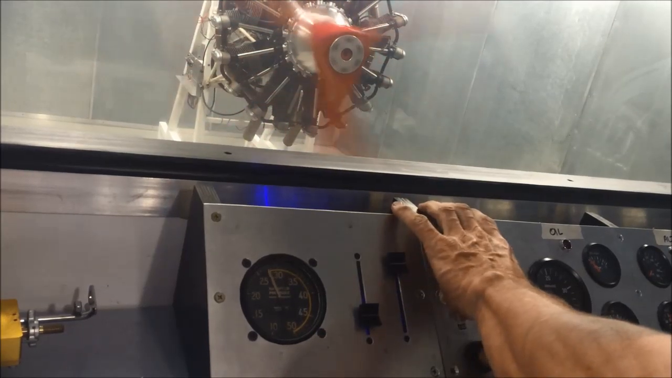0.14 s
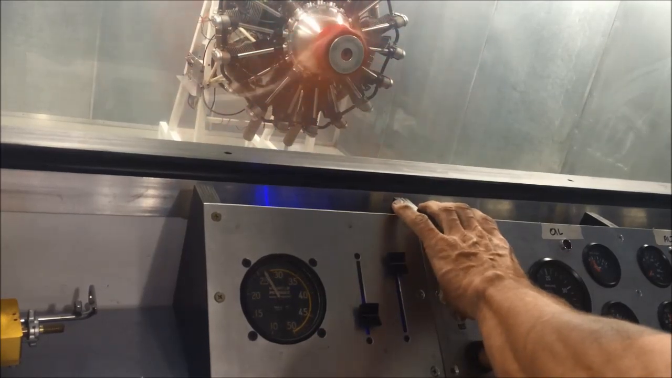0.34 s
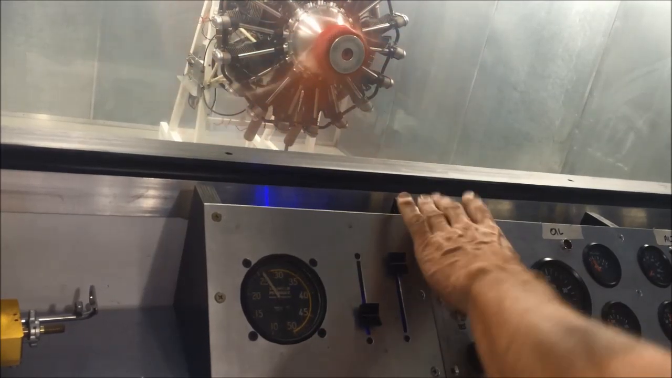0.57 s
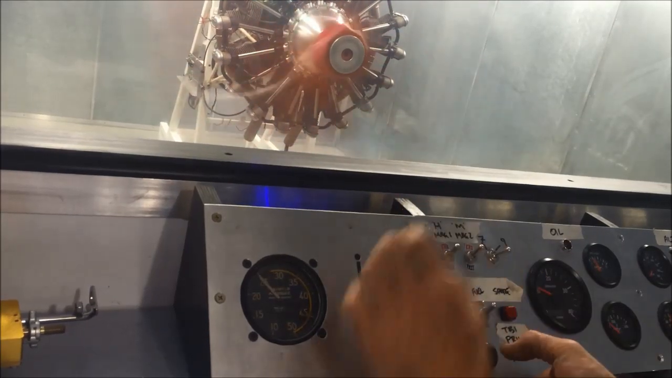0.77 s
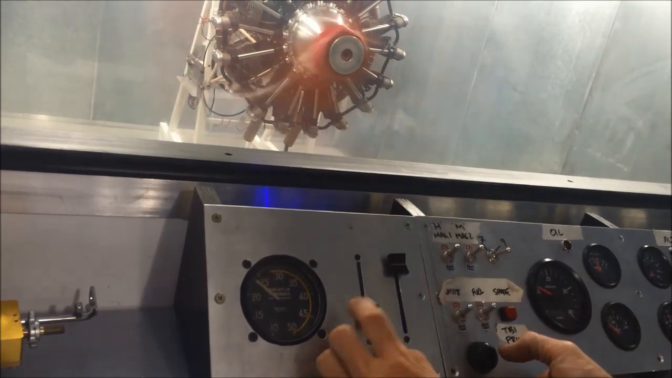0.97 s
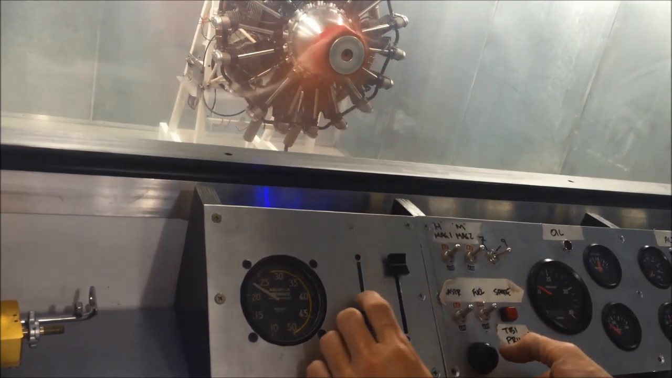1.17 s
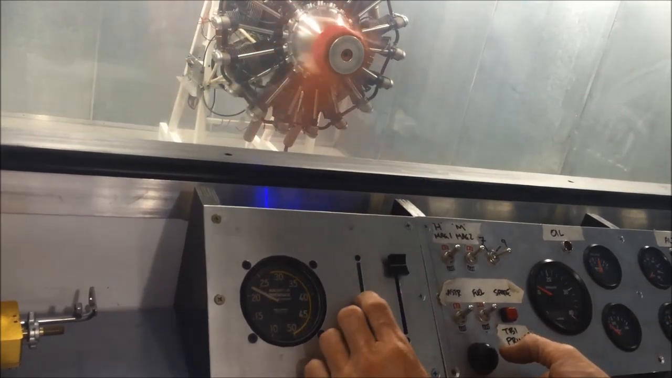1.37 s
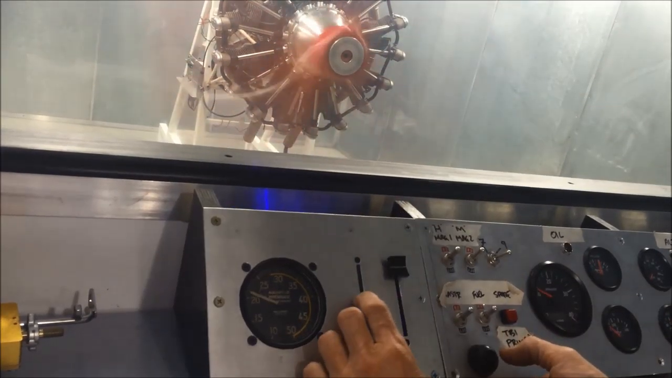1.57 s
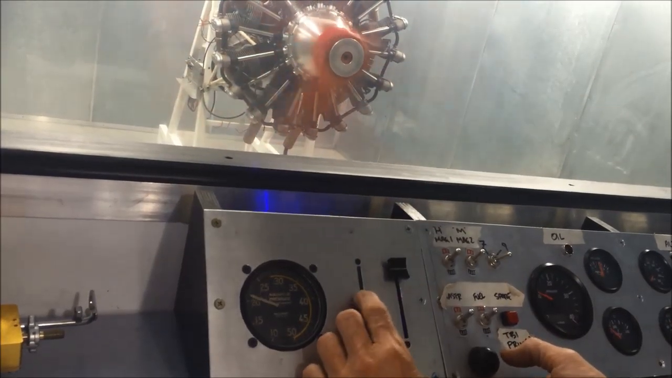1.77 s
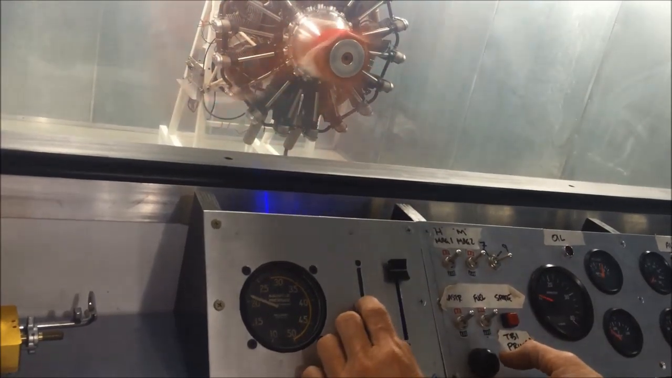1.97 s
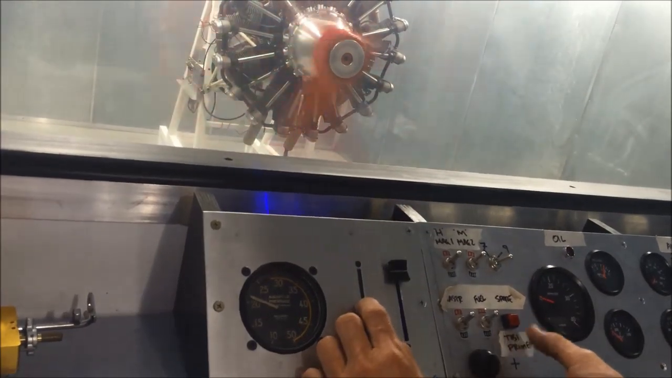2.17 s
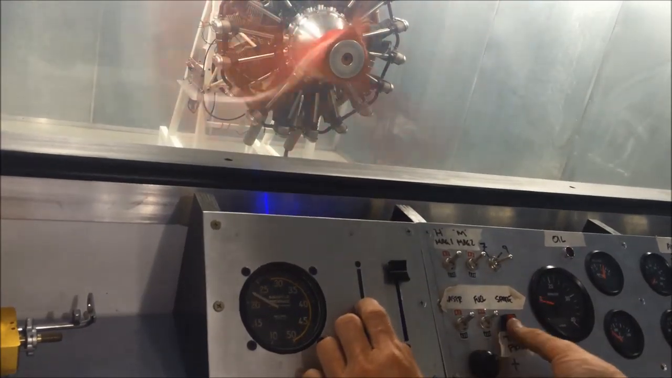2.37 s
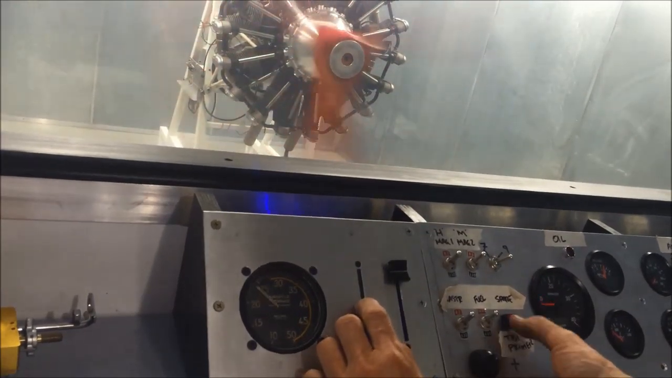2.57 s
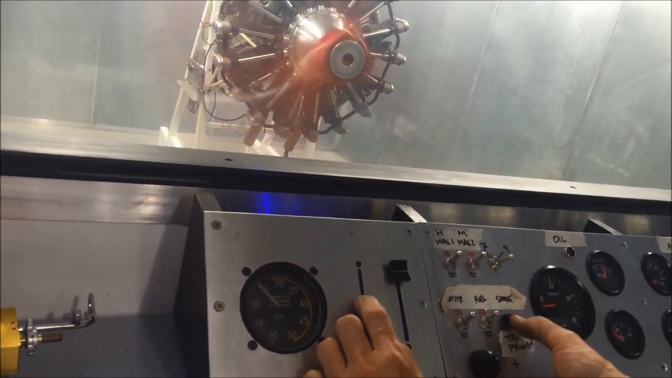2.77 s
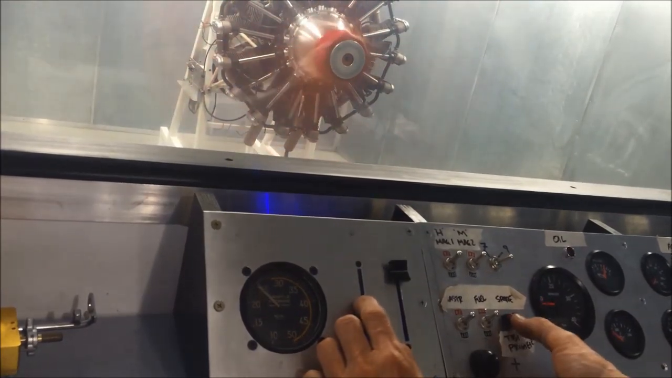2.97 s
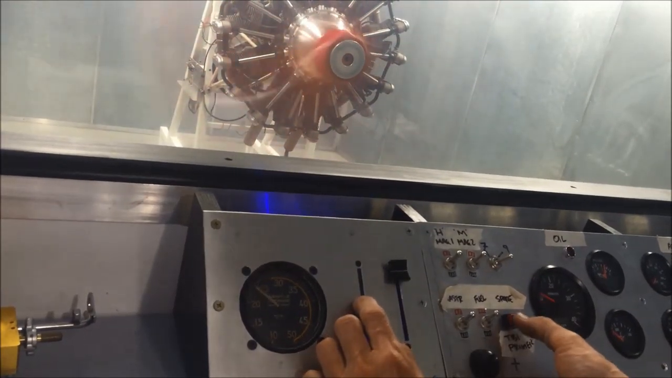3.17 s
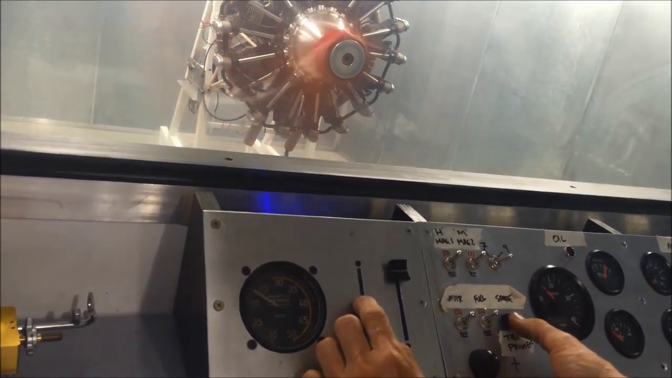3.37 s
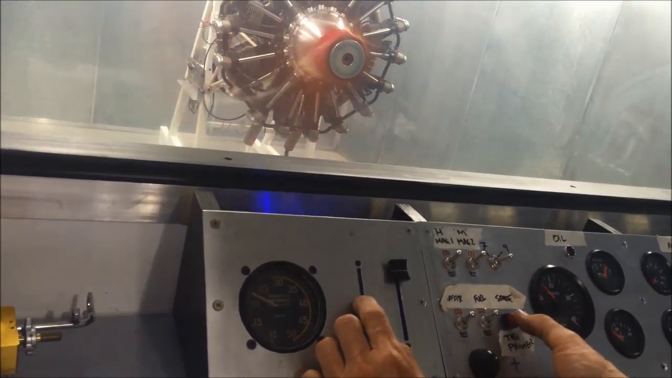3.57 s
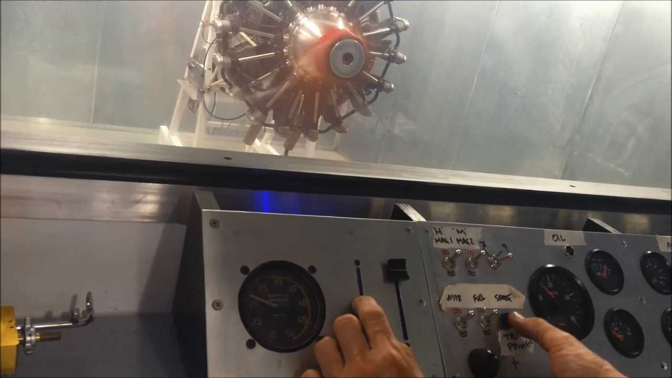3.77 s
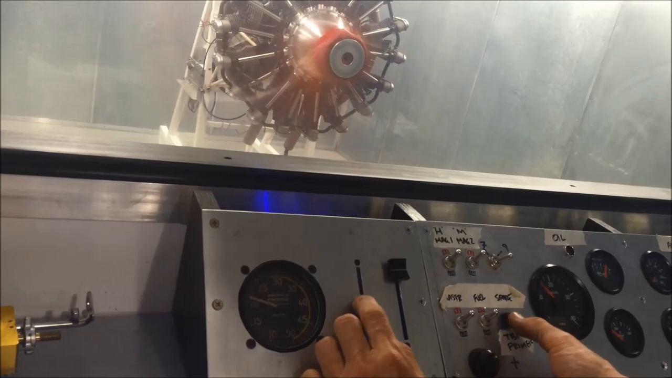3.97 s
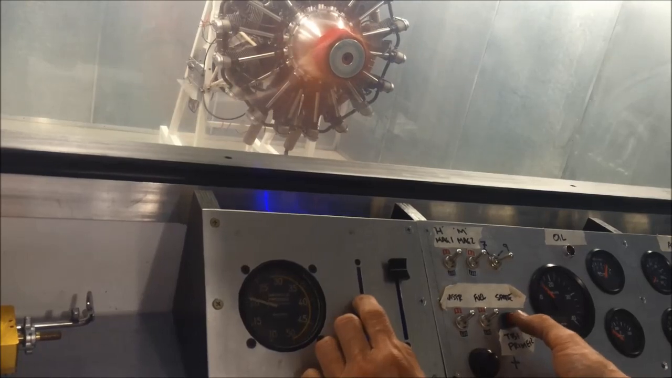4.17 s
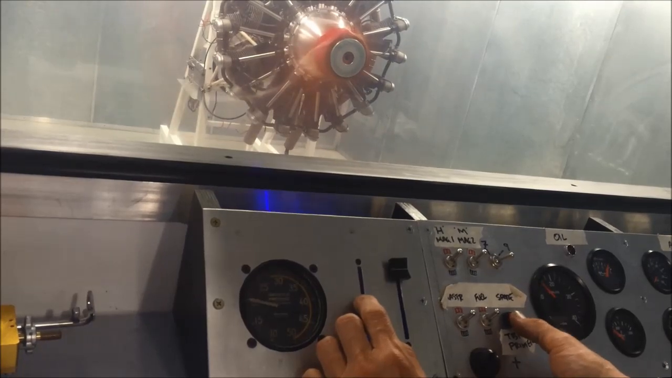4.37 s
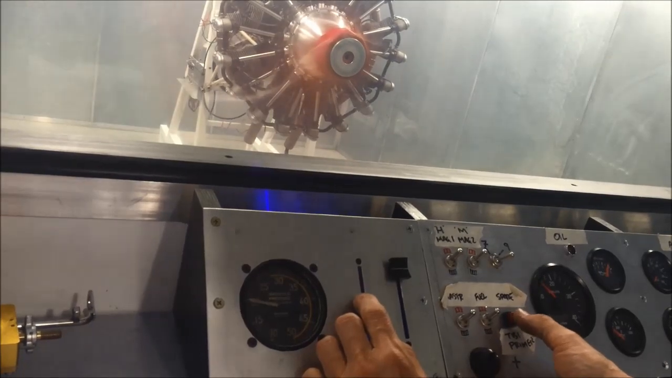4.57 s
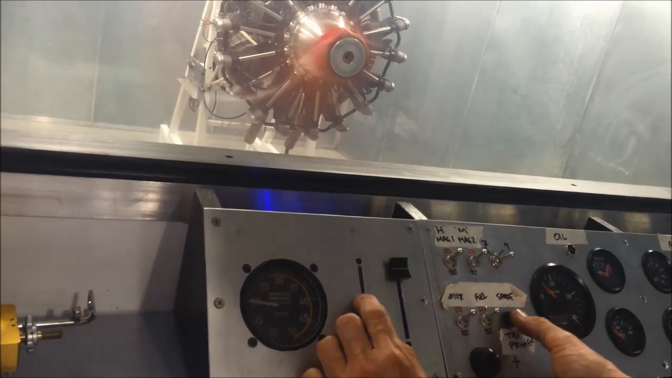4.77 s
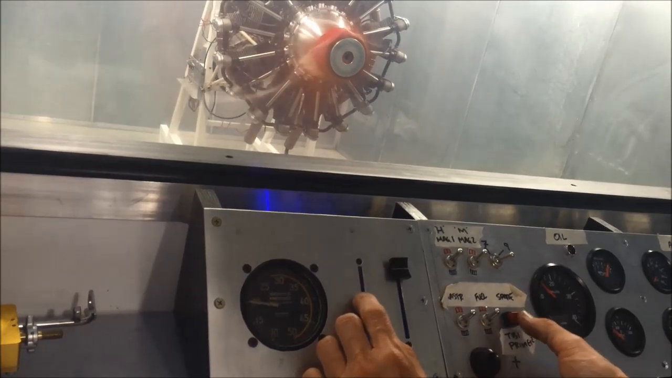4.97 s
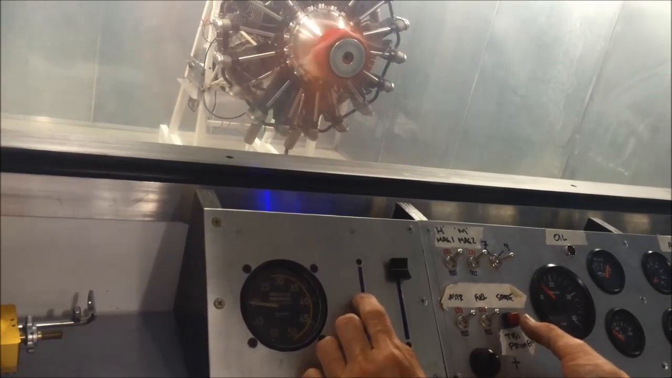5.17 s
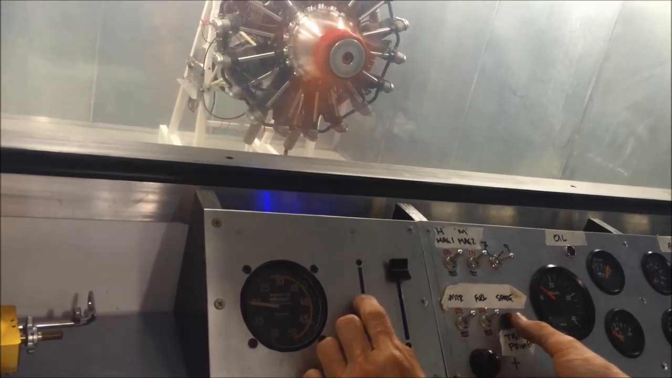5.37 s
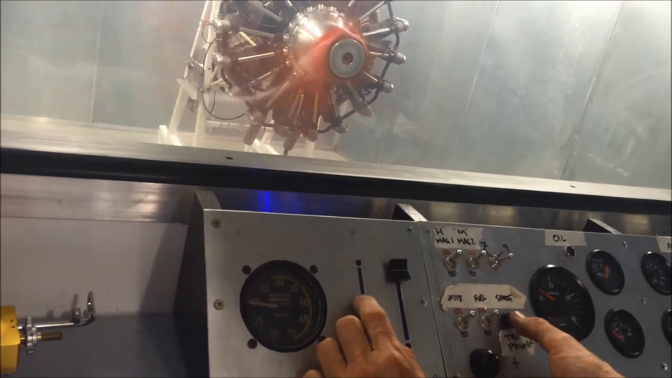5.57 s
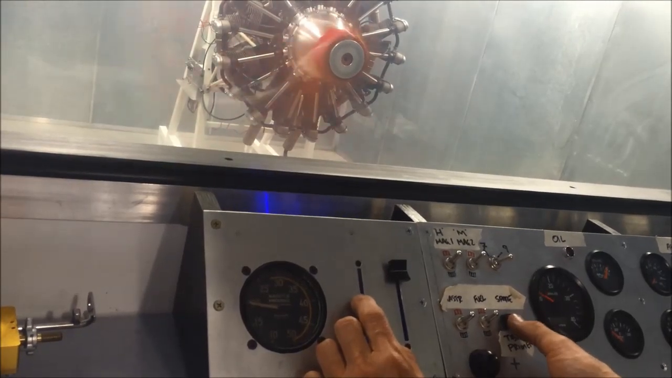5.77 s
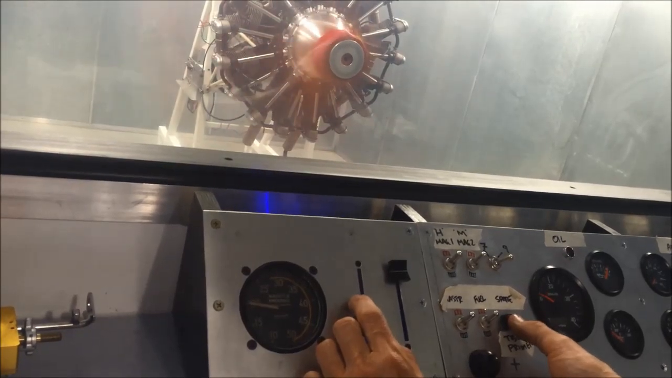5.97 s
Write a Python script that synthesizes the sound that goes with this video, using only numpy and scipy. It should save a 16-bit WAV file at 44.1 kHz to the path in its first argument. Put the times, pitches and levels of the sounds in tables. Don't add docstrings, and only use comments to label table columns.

```python
import sys
import numpy as np
from scipy import signal
from scipy.io import wavfile
from scipy.ndimage import uniform_filter1d, minimum_filter1d

SR = 44100
rng = np.random.default_rng(int(sys.argv[2]) if len(sys.argv) > 2 else 0)


def invert_db(level):
    return 10 ** (np.asarray(level, dtype=float) / 20)


def transcribe(signal):
    frames = np.atleast_2d(signal).T
    limited = np.clip(frames, -1, 1)
    pcm = np.round(limited * 32767).astype(np.int16)
    wavfile.write(sys.argv[1], SR, pcm)


N = 265923
T = np.arange(N) / SR

# (time [s], speed [turns/s], clean share of the firing tone [0-1])
SHAFT_SPEED = [(0, 7, .4), (.3, 7.9, .5), (.71, 9.1, .6), (.91, 9.8, .7), (1.2, 9.75, .7), (1.61, 8.1, .7),
               (2.15, 7.95, .7), (2.7, 7.9, .4), (3.0, 12.5, .7), (3.15, 14.4, .85), (3.37, 14.2, .85),
               (3.6, 12.7, .7), (3.8, 12.3, .8), (4.05, 12.9, .8), (4.25, 12.6, .85), (4.55, 11.8, .7),
               (4.75, 12.2, .75), (6.03, 11, .6)]
# (time [s], load [dB], air [dB])
LOAD_AND_AIR = [(0.0, -40, -45.5), (0.23, -42.5, -39.5), (0.45, -30.5, -33.5), (0.75, -35, -45.5),
                (1.11, -28.5, -40.5), (1.66, -38.5, -45), (2.33, -42.5, -40), (2.45, -44.5, -39),
                (2.59, -38.5, -37), (2.74, -43, -37), (2.85, -34, -35), (3.27, -28, -38.5),
                (3.63, -29.5, -39), (4.35, -27.5, -37.5), (4.47, -31.5, -39.5), (5.41, -31.5, -39.5),
                (5.51, -38, -39.5), (6.03, -32, -38.5)]
# (multiple of shaft speed, level [dB])
SHAFT_ORDERS = [(4, -8), (5, -5), (6, -6), (7, 0), (8, -6), (9, 2), (10, -7), (11, 1), (12, -7), (13, -5),
                (14, -6), (15, -8), (16, 2), (17, -7), (18, -2), (19, -8), (20, -3), (21, -10)]
# (frequency [Hz], width [Hz], level [dB])
CELL_MODES = [(53, 37, -18.5), (82, 12.5, 3), (102, 15.6, 4), (126.4, 17.3, 4.5), (150.6, 10.9, -5)]
# (frequency [Hz], density [dB/Hz])
RUMBLE_SPECTRUM = [(12, -47), (20, -24.5), (50, 19), (81, -7), (97, -6.5), (154, 7), (276, -12), (334, -35),
                   (420, -29.5), (550, -71), (920, -120)]
# (frequency [Hz], width [Hz], level [dB])
EXHAUST_PIPES = [(194.6, 28, 2.5), (224.5, 11.7, -2), (248.5, 39, -1)]
# (frequency [Hz], density [dB/Hz])
CLATTER_SPECTRUM = [(220, -10), (380, -3.5), (673, -6), (872, -6.5), (992, -1), (1450, -4.5), (1630, -4),
                    (1800, -4), (5000, -13.5), (6500, -75), (11000, -120)]
# (frequency [Hz], width [Hz], level [dB])
PANEL_MODES = [(1215, 25, -17), (1595, 40, -12.5), (1696, 30, -17), (2190, 90, -15)]
# (frequency [Hz], density [dB/Hz])
HISS_SPECTRUM = [(2060, -3), (3500, -1.5), (4240, -9), (5730, -3), (7700, -6), (11100, -7), (12800, -4),
                 (13900, -6), (15200, -8)]
# (time [s], frequency [Hz], level over the hiss [dB])
STARTER_WHISTLES = [
    [(.05, 9600, -4), (.2, 10900, -4), (.3, 11900, -4), (.38, 13100, -12), (.5, 13550, -19)],
    [(2.2, 12900, -12), (2.35, 12700, -4), (2.55, 11870, -9), (2.72, 11140, -13), (2.86, 12160, -5),
     (2.97, 13360, -15), (3.05, 13740, -22)],
]
# (start [s], length [s], frequency [Hz], level over the hiss [dB])
STARTER_SQUEALS = [
    (0, .12, 9150, -17),
    (.21, .2, 12800, -13),
    (.21, .15, 11700, -17),
    (0.602, 0.17, 8900, -13),
    (.62, .07, 9500, -21),
    (2.271, 0.46, 12800, -13),
    (2.497, .16, 11560, -18),
    (2.79, 0.15, 12840, -18),
]
# (start [s], length [s], level [dB], pitch [Hz])
BOOM_SURGES = [(.04, .06, -30.5, 71), (0.176, 0.075, -21, 75.1), (0.296, 0.23, -9, 73.1),
               (0.504, 0.12, -17.5, 73), (0.783, .3, -21.5, 86.73), (1.247, 0.074, -15, 84.8),
               (1.387, .09, -18, 82), (1.474, 0.26, -11, 75.4), (1.661, .2, -6.5, 72.2),
               (1.867, 0.18, -11.5, 71.5), (2.077, 0.14, -15.5, 73.55), (2.22, .1, -31, 71.6),
               (2.36, 0.09, -19, 75.4), (2.5, 0.053, -19.5, 74.56), (2.652, .22, -23, 70),
               (2.876, 0.12, -4, 73.5), (3.032, 0.37, -24, 72.26), (3.565, 0.34, -13, 74.87),
               (4.102, 0.037, -11, 78.3), (4.246, .3, -15, 73.4), (4.537, 0.27, -16, 72.6),
               (5.0, 0.2, -16.5, 73.94), (5.274, .18, -14, 72.9), (5.529, 0.11, -8.5, 75.14),
               (5.67, .105, -4.5, 74.6), (5.826, 0.098, -8.5, 77.16), (5.99, 0.057, -13, 87)]
# (time [s], peak [dB], length [ms])
HARD_FIRINGS = [(0.066, -10, 7), (0.242, -13.5, 25), (0.44, -2, 39), (0.517, 2.5, 6.3), (0.6, 1, 6.7),
                (0.639, -2.5, 9.6), (0.674, -4, 7.2), (0.727, -18, 62), (0.812, -17, 21),
                (1.082, -18, 23), (1.117, -6.5, 13.9), (1.185, -3, 9.2), (1.229, -5, 9.6),
                (1.325, -7, 9.7), (1.371, -7, 13.8), (1.476, -1.5, 11), (1.512, -4, 9.9),
                (1.588, -2, 10.7), (1.85, -4, 51), (1.977, -4.5, 28), (2.124, -4.5, 53),
                (2.279, -16.5, 44), (2.55, -16.5, 47), (2.663, -13.5, 35), (2.82, -11.5, 12),
                (3.052, -6, 18), (3.397, -24, 12.5), (3.473, -11, 10.5), (3.506, -12, 27.7),
                (3.571, -2, 13), (3.633, -6, 31.4), (3.825, -10, 9.1), (3.879, -1.5, 9.4),
                (3.956, -3.5, 8.5), (4.129, -16, 27.5), (4.207, -11, 28), (4.409, -6.5, 23),
                (4.463, -6.5, 40), (4.499, -4, 9.7), (4.561, 2, 11.5), (4.644, -2, 8.05), (4.685, -4, 9.6),
                (4.722, -7.5, 22), (4.802, -11, 18), (4.858, 1, 8.8), (4.891, 0, 14.4),
                (4.943, -10.5, 20.5), (5.005, -11, 27), (5.03, -17, 12.2), (5.089, -26, 11.1),
                (5.241, -5, 14.3), (5.268, -1.5, 13), (5.43, -2, 13.4), (5.508, -9, 22.8), (5.733, -14, 34),
                (5.83, -8, 14), (5.891, -14, 19), (5.923, -3.5, 13), (5.964, -2, 13.4)]
# (first [s], gap [s], number, peak [dB], length [ms])
EVEN_FIRINGS = [
    (2.935, .063, 2, -4, 9),
    (3.111, .0355, 8, -14, 14),
    (4.0, .036, 3, -18, 16),
]
# (time [s], lift [dB], length [ms])
AIR_SPURTS = [(0.069, 5.5, 31), (.215, 7.5, 97), (.33, 5, 30), (2.23, 1.5, 19), (2.389, 3.5, 25),
              (2.55, 4, 42), (2.69, 3.5, 22), (2.79, 3, 62), (2.94, 4, 16), (3.031, 6.5, 17.7),
              (3.439, 4.5, 86), (4.3, 1.5, 80), (5.18, 2.5, 53)]
# (frequency [Hz], width [Hz], level [dB])
SHORT_PIPE_MODES = [(343, 23, 2), (435, 23, -5), (551, 43, 1), (670, 58, 2.5), (775, 20, -4)]
# (time [s], lift [dB], length [s])
PIPE_BARKS = [(.07, 9, 0.025), (.54, 4.5, 0.065), (.7, 2.5, 0.052), (1.05, 2.5, .05), (2.38, 7, .03),
              (2.55, 10, 0.027), (3.19, 5.5, 0.092), (3.34, 6.5, .06), (4.0, 0, .05), (4.27, -3, .05),
              (4.59, 2, 0.028), (4.69, 4, 0.029), (5.23, 3.5, 0.068), (5.41, 0, 0.028), (5.85, 0.5, 0.029)]
# (time [s], level [dB], length [s])
GEAR_SWELLS = [
    (2.378, -44, 0.026),
    (2.794, -40, 0.044),
    (3.142, -38, .1),
    (3.4, -36, 0.063),
    (3.598, -44.5, .15),
    (4.303, -41.5, 0.17),
    (4.636, -38.5, 0.081),
    (5.008, -42, .1),
    (5.3, -43.5, 0.19),
    (5.974, -43, .1),
]


def evened(x):
    return x / np.sqrt(np.mean(x ** 2) + 1e-20)


def levelled(x, span_s=0.29):
    power = abs(uniform_filter1d(x ** 2, int(span_s * SR)))
    return x / np.sqrt(power + 1e-12)


def curves(rows):
    s, *columns = np.transpose(rows)
    return [np.interp(T, s, column) for column in columns]


def bumps(rows):
    coarse = T[::64]
    bells = sum(height * np.exp(-((coarse - s) / length) ** 2) for s, height, length in rows)
    return np.interp(T, coarse, bells)


def resonate(x, hz, *widths):
    turn = np.exp(2j * np.pi * np.cumsum(hz * np.ones(len(x))) / SR)
    low = x * turn.conj()
    for r in np.exp(-np.pi * np.array(widths) / SR):
        low = signal.lfilter([1 - r], [1, -r], low)
    return 2 * (turn * low).real


def rung(drive, modes):
    total = 0
    for k, (hz, width, db) in enumerate(modes):
        total = total + (-1) ** k * invert_db(db) * evened(resonate(drive, hz, width, 3 * width))
    return evened(total)


def noise(points, patchy_db, flicker_db, size):
    frames, hz = 4 * N // size + 5, np.fft.rfftfreq(size, 1 / SR)
    real, imaginary, patches = rng.standard_normal((frames, len(hz), 3)).T
    patches = uniform_filter1d(patches, size // 64, 0)
    patches = evened(uniform_filter1d(patches, 8192 // size, 1))
    flicker = evened(uniform_filter1d(rng.standard_normal(frames), 4096 // size))
    f, db = np.transpose(points)
    shape_db = np.interp(np.log(hz + 1), np.log(f + 1), db)[:, None]
    shape_db = shape_db + patchy_db * patches + flicker_db * flicker
    spectra = (real + 1j * imaginary) * invert_db(shape_db)
    return evened(signal.istft(spectra, nperseg=size, noverlap=size * 3 // 4)[1][:N])


def firings():
    rate, clean = curves(SHAFT_SPEED)
    wander = evened(uniform_filter1d(rng.standard_normal(N), 6000))
    angle = 2 * np.pi * (np.cumsum(rate) / SR + .007 * wander)
    knots = np.arange(0, N / SR + .3, .2)
    orders = np.zeros(N)
    for k, db in SHAFT_ORDERS:
        fading_db = np.interp(T, knots, 3.5 * rng.standard_normal(len(knots)))
        orders += invert_db(db + fading_db) * np.cos(k * angle + 2 * np.pi * rng.random())
    combustion = np.sqrt(SR / 1500) * rng.standard_normal(N)
    return clean * evened(orders) + (1 - clean) * combustion


def exhaust(thrum_db, roar_db, swell):
    drive = firings()
    rumble = noise(RUMBLE_SPECTRUM, patchy_db=-1.0, flicker_db=-3.0, size=2048)
    thrum = levelled(rung(drive, CELL_MODES) + invert_db(-7) * rumble, span_s=0.13)
    punch = (swell + 0.04) / (uniform_filter1d(swell, 6000) + 0.27)
    roar = levelled(rung(drive, EXHAUST_PIPES), span_s=0.197)
    return invert_db(thrum_db) * thrum * punch ** 0.17 + invert_db(roar_db) * roar


def clatter(db):
    rattle = noise(CLATTER_SPECTRUM, patchy_db=2.0, flicker_db=0.8, size=512)
    panels = sum(invert_db(level) * evened(resonate(rattle, hz, width)) for hz, width, level in PANEL_MODES)
    return invert_db(db) * evened(rattle + panels)


def hiss(db):
    air = noise(HISS_SPECTRUM, patchy_db=1.2, flicker_db=.7, size=512)
    breath, whistle = rng.standard_normal(N), np.zeros(N)
    for rows in STARTER_WHISTLES:
        near = slice(round(rows[0][0] * SR), round(rows[-1][0] * SR))
        hz, over_db = (curve[near] for curve in curves(rows))
        whistle[near] += invert_db(over_db - 3) * evened(resonate(breath[near], hz, 1100, 1600))
    for s, length, hz, over_db in STARTER_SQUEALS:
        near = slice(round(s * SR), round((s + length) * SR))
        squeal = evened(resonate(breath[near][::-1], hz, 220, 400))
        whistle[near] += invert_db(over_db) * signal.windows.tukey(len(squeal), .4) * squeal
    return invert_db(db + 2.86) * (air + whistle)


def surges():
    rise_s, fall_s, lull_db = 0.022, 0.02444, -34.5
    power = invert_db(2 * lull_db) * np.ones(N)
    pull = 73.5 * power
    for s, length, db, hz in BOOM_SURGES:
        near = slice(round(s * SR), round((s + length + 8 * fall_s) * SR))
        lag = T[near] - s
        build = np.minimum(lag / rise_s, 1) ** 2
        ring_out = np.exp(-2 * np.maximum(lag - length, 0) / fall_s)
        run = invert_db(2 * db) * build * ring_out
        power[near] += run
        pull[near] += hz * run
    return pull / power, np.sqrt(power)


def swells():
    power = np.zeros(N)
    even = [(s + k * gap, db, ms) for s, gap, number, db, ms in EVEN_FIRINGS for k in range(number)]
    for s, db, ms in [*HARD_FIRINGS, *even]:
        near = slice(max(round((s - .1) * SR), 0), round((s + 0.085) * SR))
        lag = (T[near] - s) / (ms / 1000)
        power[near] += invert_db(2 * db) * np.exp(-(lag / np.where(lag < 0, .6, .8)) ** 2)
    return np.sqrt(power)


def boom(hz, height, swell):
    waver = uniform_filter1d(rng.standard_normal(N), 900)
    waver = evened(uniform_filter1d(waver, 900))
    tone = np.cos(2 * np.pi * np.cumsum(hz + 1.45 * waver) / SR)
    ring = tone * np.hypot(invert_db(-1.0) * height, invert_db(-3) * swell)
    booth = signal.butter(3, 58, "high", fs=SR, output="sos")
    early = np.roll(ring, -round(0.0044 * SR))
    return signal.sosfilt(booth, early)


def spurts():
    return invert_db(sum(db * (T >= s) * np.exp(-abs(T - s) / (ms / 1000)) for s, db, ms in AIR_SPURTS))


def throat(db):
    return invert_db(db) * levelled(rung(rng.standard_normal(N), SHORT_PIPE_MODES))


def gear():
    hum = levelled(resonate(rng.standard_normal(N), 1011, 18, 36), span_s=.08)
    steady = invert_db(-50.5) * np.clip((T - 2.78) / .2, 0, 1)
    lifts = bumps([(s, invert_db(db), length) for s, db, length in GEAR_SWELLS])
    return hum * np.hypot(steady, lifts)


def scene():
    load_db, air_db = curves(LOAD_AND_AIR)
    over_idle_db = load_db + 31
    swell, puff, bark_db = swells(), spurts(), bumps(PIPE_BARKS)
    hz, height = surges()
    rev_db = 2.8 * np.maximum(curves(SHAFT_SPEED)[0] - 12.47, 0)
    boom_db = uniform_filter1d(20 * np.log10(np.hypot(height, 0.45 * swell)), size=2500) + 14

    thrum_db = -19.5 + 0.51 * over_idle_db + 0.43 * boom_db + rev_db
    roar_db = -34 + 1.36 * over_idle_db + 0.035 * boom_db + 0.3 * bark_db
    throat_db = -39 + over_idle_db + bark_db
    clatter_db = -35 + 0.59 * over_idle_db + 0.6 * (air_db + 37.5)

    engine = boom(hz, height, swell) + exhaust(thrum_db, roar_db, swell) + throat(throat_db) + gear()
    leaks = np.sqrt(puff) * clatter(clatter_db) + puff * hiss(air_db - 0.5)
    return (engine + leaks)[None]


def roll_off(x):
    return signal.sosfilt(signal.butter(12, 15870, fs=SR, output="sos"), x)


def record(dry):
    thin = signal.sosfilt(signal.butter(2, 34, "high", fs=SR, output="sos"), dry)
    room_left = np.minimum(.88 / (abs(thin) + 1e-9), 1)
    gain = uniform_filter1d(minimum_filter1d(room_left, size=801), size=401)
    band_limit = signal.firwin(1023, 15330, window=("kaiser", 10), fs=SR)
    limited = signal.oaconvolve(thin * gain, band_limit[None], "same")
    return roll_off(limited)


dry = scene()
out = record(dry)
transcribe(out)
```